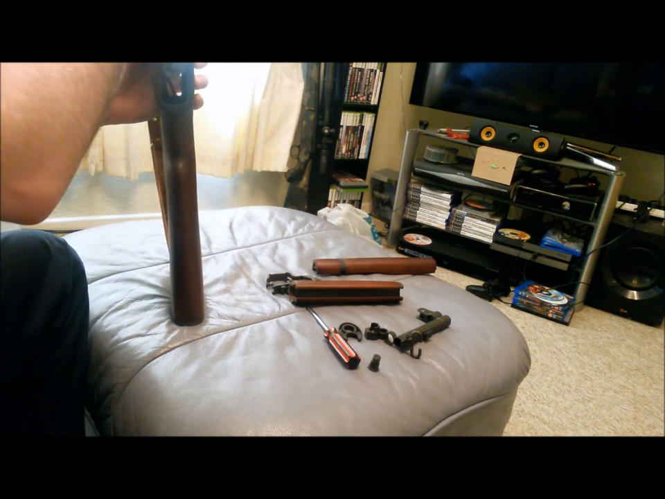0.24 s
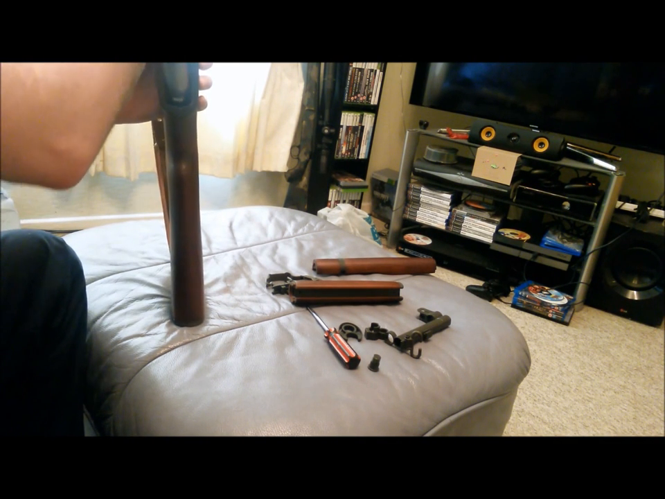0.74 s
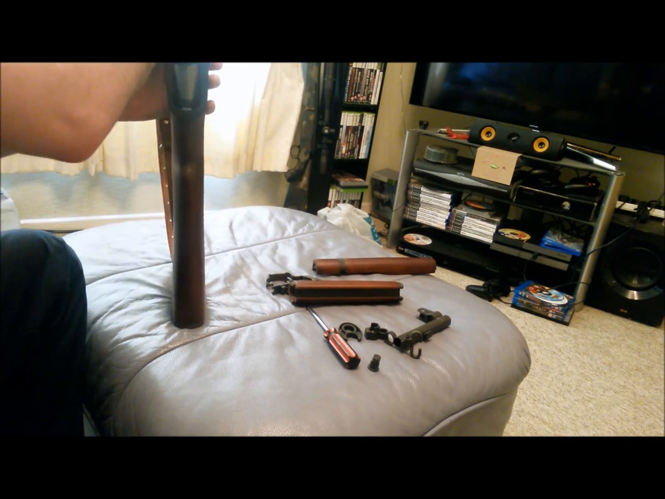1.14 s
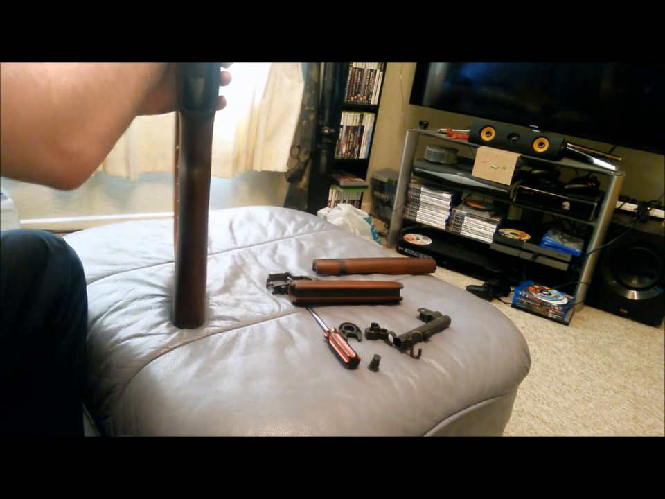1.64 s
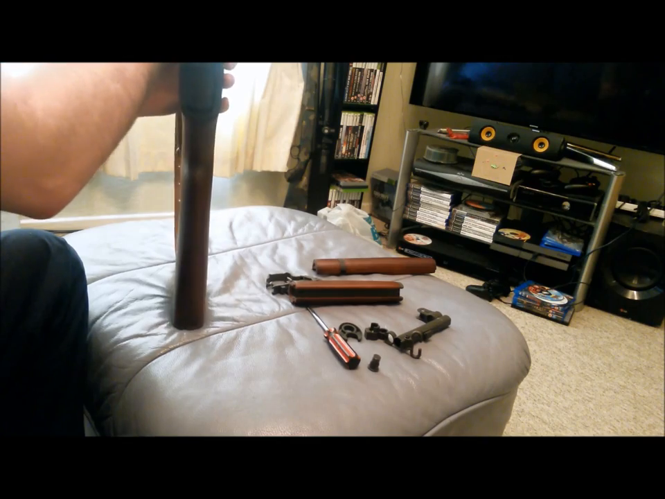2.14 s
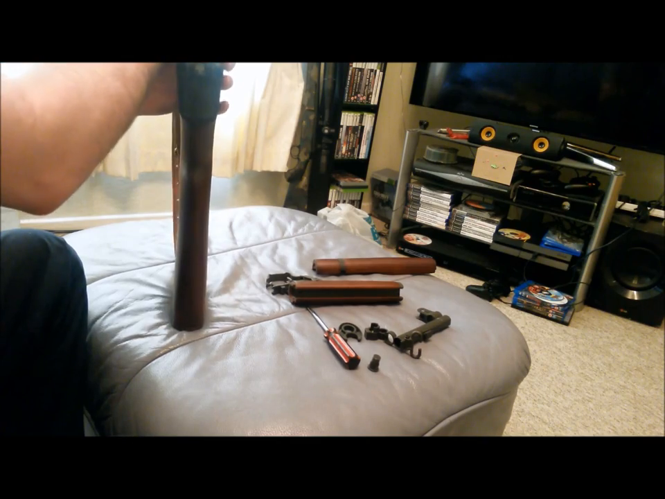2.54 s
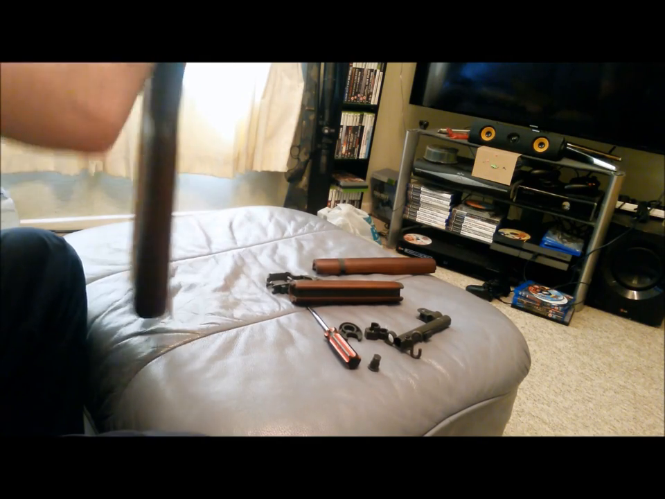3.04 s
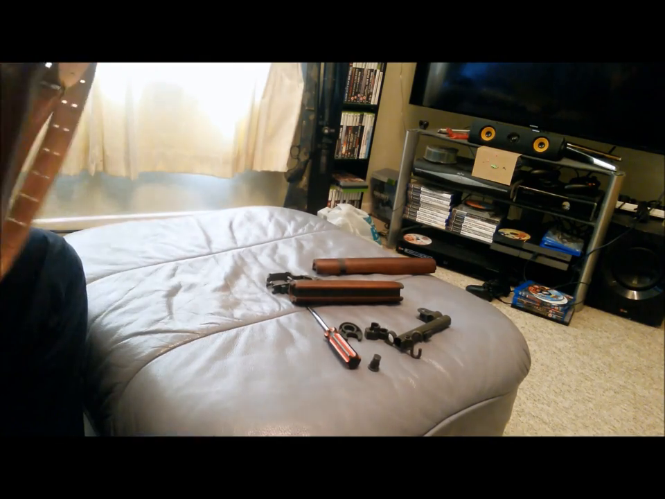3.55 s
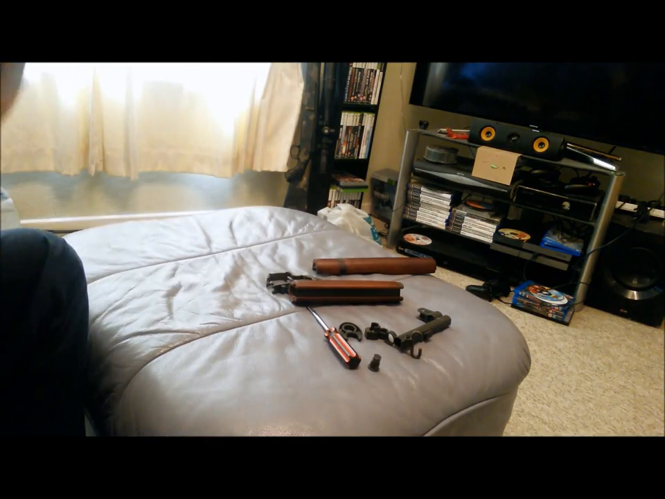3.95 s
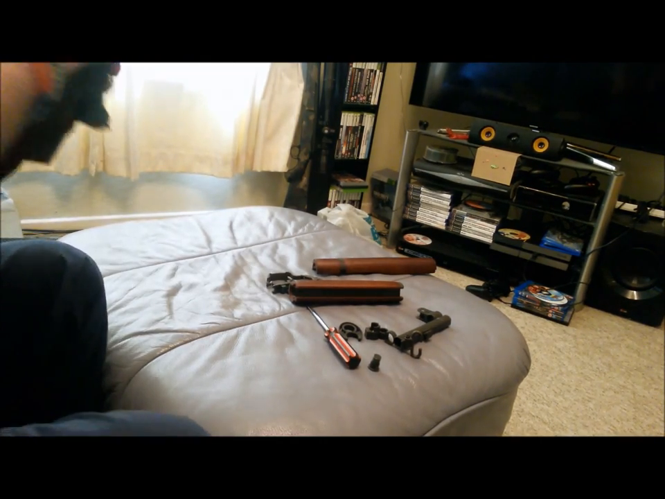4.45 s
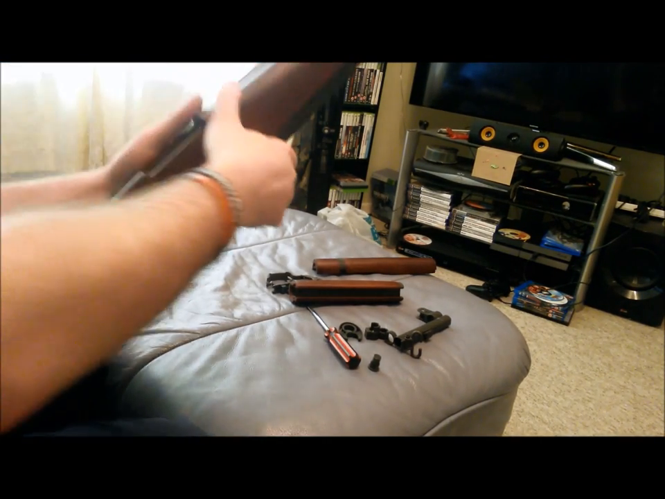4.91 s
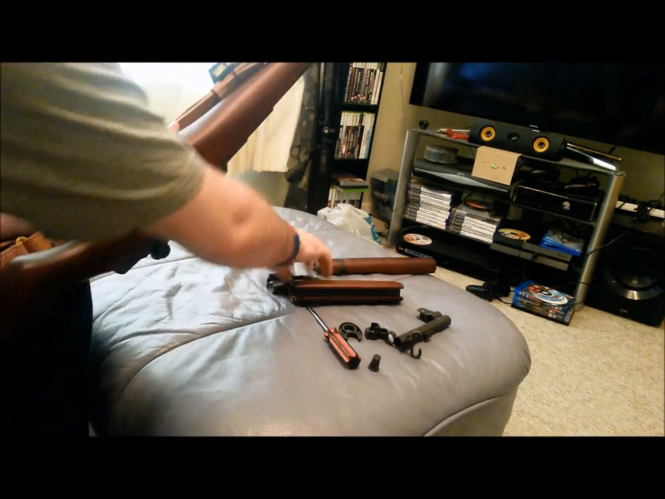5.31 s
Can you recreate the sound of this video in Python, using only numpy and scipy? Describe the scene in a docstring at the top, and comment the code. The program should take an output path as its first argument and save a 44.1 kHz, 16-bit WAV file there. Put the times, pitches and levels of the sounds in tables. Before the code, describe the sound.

A small living room, almost silent, with a very faint hush. From the start, barely audible rubbing and soft padded bumps of a rifle being handled at 0.1-0.3 s. A tiny part tick comes at 0.5 s, and a crisp steel catch click at 1.0 s. From 1.5 s dull bumps and light taps gather; a tight part slides with a grainy rasp at 1.7-1.95 s, ending in a knock and sharp click. Two short knocks follow at about 2.4 s, then the loudest, hard metallic cracks with a hollow body at 2.63-2.69 s. Another knock comes at 2.95 s, and a loose part rattles in quick weakening runs from 3.1 to 3.5 s. Cloth and hands swish through 4-5 s with small taps and faint clicks. At 5.5 s a bright steel piece clacks twice and rings thinly. Close stereo pickup, short room reflections, brighter on the right.

```python
"""An airsoft rifle is taken apart on a padded footstool in a small living room with a faint hush. Filtered
noise gives the rub of hands and clothes in swelling strokes and the slide of tight parts from the start; soft
bumps, low decaying cycles, join at once. From 0.5 s parts knock (ringing modes), from 1 s steel catches click.
The loudest knocks fall near 2.7 s; from 3.1 to 3.5 s a loose part rattles in runs of weakening contacts. At 5.5
s a steel piece clacks on the footstool, noise bursts over ringing modes. The right side is nearer, brighter."""
import sys
import numpy as np
from scipy import signal
from scipy.fft import rfft, irfft, next_fast_len
from scipy.io import wavfile
from scipy.ndimage import map_coordinates

SR = 44100
rng = np.random.default_rng(int(sys.argv[2]) if len(sys.argv) > 2 else 0)


def persist_wave(psi):
    """Save psi, clipped to +-1, as 16-bit WAV."""
    counts = np.round(np.clip(psi, -1, 1) * 32767).astype(np.int16)
    wavfile.write(sys.argv[1], SR, np.atleast_2d(counts).T)


N = 245894  # length [samples]
T = np.arange(SR // 4) / SR  # time within one blow [s]


def amp(db):
    """Decibels to gain."""
    return 10 ** (np.asarray(db) / 20)


def unit(x):
    """Scale to rms 1."""
    return x / np.sqrt(np.mean(x ** 2) + 1e-20)


def strike(x):
    """Scale a blow so that its first 4 ms have the power of a sine of peak 1."""
    onset = x[:SR // 250]
    return x / np.sqrt(2 * np.mean(onset ** 2) + 1e-20)


def along(points, hz):
    """Read a (frequency [Hz], value) curve on a log frequency axis."""
    f, v = np.transpose(points)
    return np.interp(np.log(hz + 1), np.log(f + 1), v)


def wobble(rate):
    """A smooth random curve with rate knots a second."""
    knots = rng.standard_normal(int(N * rate / SR) + 4)
    return map_coordinates(knots, [np.arange(N) * rate / SR])


def filtered(x, response):
    """Apply a response, given as a function of frequency, to x."""
    n = x.shape[-1]
    m = next_fast_len(n + 8192)
    hz = np.fft.rfftfreq(m, 1 / SR)
    return irfft(rfft(x, m) * response(hz), m)[..., :n]


def colour(x, spectrum):
    """Give x a spectrum through a minimum-phase filter, so nothing sounds early, at rms 1."""
    n = x.shape[-1]
    m = next_fast_len(n + 4096)
    gain = amp(along(spectrum, np.fft.rfftfreq(m, 1 / SR)))
    # folding the cepstrum onto positive times makes the filter causal
    cepstrum = irfft(np.log(gain), m)
    cepstrum[1:m // 2] *= 2
    cepstrum[m // 2 + 1:] = 0
    response = np.exp(rfft(cepstrum))
    return unit(irfft(rfft(x, m) * response, m)[..., :n])


def fade(t60):
    """Free decay of a struck thing, 60 dB in t60 seconds."""
    return 1000 ** (-T / max(t60, 1e-4))


def ring(modes):
    """Damped modes, struck at slightly new strengths and signs each time."""
    total = np.zeros(len(T))
    for hz, db, t60 in modes:
        strength = rng.choice([-1, 1]) * amp(db + rng.normal())
        total += strength * fade(t60) * np.sin(2 * np.pi * hz * T)
    return strike(total)


def crack(spectrum, t60):
    """The short noise of a contact: a decaying burst with the contact's colour."""
    burst = rng.standard_normal(len(T)) * fade(t60)
    return strike(colour(burst, spectrum))


def add(track, s, sound):
    """Mix a stereo sound in at time s."""
    part = track[:, max(round(s * SR), 0):][:, :sound.shape[1]]
    part += sound[:, :part.shape[1]]


# left-right likeness of diffuse sound: (frequency [Hz], correlation [1])
LIKENESS = [(100, 0.76), (400, 0.61), (1200, 0.033), (2500, 0.13), (8000, 0.031)]


def diffuse(pair):
    """Two unrelated noises become a sound field whose sides are most alike in the bass."""
    def mid_side(hz):
        turn = np.arccos(np.clip(along(LIKENESS, hz), -1, 1)) / 2
        return np.array([np.cos(turn), np.sin(turn)])
    mid, side = filtered(pair, mid_side)
    return np.array([mid + side, mid - side])


# how long the room rings: (frequency [Hz], t60 [s])
ROOM_DECAY = [(80, 0.17), (150, 0.26), (400, 0.34), (1100, 0.24), (3000, 0.26), (7500, 0.23), (14000, 0.23)]


def in_room(x, wet_db, first_wall=0.004):
    """Direct sound, reaching the right side first, then the walls' answer as decaying diffuse noise."""
    hz, t, z = signal.stft(rng.standard_normal((2, SR // 3)), SR, nperseg=256)
    t60 = np.maximum(along(ROOM_DECAY, hz), .02)
    decay = 1000 ** (-t / t60[:, None])
    tail = diffuse(signal.istft(z * decay, SR, nperseg=256)[1])
    tail_time = np.arange(tail.shape[1]) / SR
    tail = tail * (1 - np.exp(-(tail_time / first_wall) ** 2))  # the walls answer after a moment
    paths = amp(wet_db) * tail / np.linalg.norm(tail[0])
    paths[[0, 1], [4, 0]] += 1  # direct sound: left 4 samples after right
    return signal.fftconvolve(x[None], paths, axes=1)


# colour of the idle room: (frequency [Hz], level [dB])
HUSH_COLOUR = [(20, -24), (33, -11.5), (50, -4.5), (62, -20.5), (85, -5), (150, -10.5), (250, -9.5),
               (500, -19.5), (1000, -24.5), (1450, -17.5), (2500, -24), (5000, -24), (8000, -26),
               (14500, -24)]
HUSH_DB = -72


def room_hush():
    """The idle room: steady diffuse noise, coloured."""
    return amp(HUSH_DB) * colour(diffuse(rng.standard_normal((2, N))), HUSH_COLOUR)


def effort(strokes):
    """Gain per sample: each stroke speeds up smoothly, then slows to rest; overlaps add in power."""
    t = np.arange(N) / SR
    power = np.zeros(N)
    for s, rise, fall, db in strokes:
        moving = (t > s) & (t < s + rise + fall)
        progress = np.interp(t[moving], [s, s + rise, s + rise + fall], [0, 1, 0])
        speed = np.sin(np.pi / 2 * progress) ** 2
        power[moving] += (amp(db) * speed) ** 2
    return np.sqrt(power)


def friction(spectrum, grains_per_s, grain_share, unsteady_db):
    """Many tiny slips of uneven size over a smooth rub, unsteady in level."""
    slips = (rng.random(N) < grains_per_s / SR) * rng.standard_normal(N)
    share = np.clip(grain_share, 0, 1)
    smooth_rub = rng.standard_normal(N)
    force = np.sqrt(share) * unit(slips) + np.sqrt(1 - share) * smooth_rub
    return colour(force * amp(unsteady_db * wobble(60)), spectrum)


# colour of rubbed cloth: (frequency [Hz], level [dB])
CLOTH_COLOUR = [(290, -26), (500, -6.5), (796, -5.5), (1060, -5.5), (1180, -3.5), (1630, -13), (1930, -2.5),
                (2230, -8), (3590, -6.5), (5330, -5), (7690, -0.5), (14500, -18)]
# strokes of sleeves and trousers: (time [s], speeding up [s], slowing down [s], level at full speed [dB])
CLOTH_STROKES = [(-0.1, 0.29, 0.31, -73), (0.38, 0.14, 0.17, -74), (0.78, 0.044, 0.1, -77),
                 (0.88, 0.061, 0.41, -71), (1.28, .11, 0.21, -73), (1.45, .1, 0.11, -63.5),
                 (1.58, 0.094, 0.45, -62), (1.82, 0.12, 0.061, -51.5), (2.0, .17, 0.088, -68.5),
                 (2.24, 0.023, 0.53, -64.5), (2.8, 0.14, 0.51, -61.5), (3.18, 0.19, 0.13, -54.5),
                 (3.46, 0.016, 0.39, -60), (3.7, 0.11, 0.27, -59.5), (4.0, 0.26, 0.18, -63),
                 (4.26, 0.19, 0.47, -57), (4.68, 0.056, 0.19, -60), (4.84, 0.057, 0.58, -65),
                 (5.08, 0.2, 1, -61)]


def cloth_swishes():
    """Sleeves and trousers swish: dense small slips over a mostly smooth rub."""
    rub = friction(CLOTH_COLOUR, grains_per_s=1400, grain_share=0.33, unsteady_db=-1.0)
    return effort(CLOTH_STROKES) * rub


# colour of hands on the stock: (frequency [Hz], level [dB])
HAND_COLOUR = [(29, -37), (50, -6), (138, 3.5), (248, -7), (312, 2.5), (347, -8.5), (445, -6), (859, -8.5),
               (1030, -30), (1290, -4.5), (2240, -25.5), (3500, -16), (4550, -54), (7700, -120)]
# shifts of the grip: (time [s], speeding up [s], slowing down [s], level at full speed [dB])
HAND_STROKES = [(0.08, 0.1, 0.27, -71.5), (1.57, 0.13, 0.039, -56), (1.76, 0.039, 0.29, -61),
                (2.07, 0.025, 0.14, -65), (3.28, 0.14, 0.43, -69.5), (4.31, 0.19, 0.44, -57.5),
                (4.85, 0.16, 0.93, -72), (5.42, 0.031, 0.17, -58.5)]


def hand_shifts():
    """Hands shift on the stock: sparser slips with little smooth rub."""
    rub = friction(HAND_COLOUR, grains_per_s=260, grain_share=0.89, unsteady_db=0.2)
    return effort(HAND_STROKES) * rub


# colour of hard parts scraping: (frequency [Hz], level [dB])
SCRAPE_COLOUR = [(150, -31.5), (350, -25.5), (600, -25.5), (900, -6.5), (1450, -5), (2050, -10.5),
                 (2600, -17), (4200, -15), (5500, -21.5), (7600, -10), (10000, -43.5), (14000, -28.5)]
# slides of tight parts:
# (time [s], speeding up [s], slowing down [s], level of the rasp at full speed [dB], part's resonance [Hz])
PART_SLIDES = [(0.0, 0.23, 0.14, -70.5, 1460), (0.39, 0.073, 0.079, -76.5, 1450),
               (1.419, 0.18, 0.19, -65.5, 1660), (1.71, 0.2, 0.07, -44.5, 1760),
               (2.24, .1, 0.069, -56, 1880), (2.9, 0.14, 0.35, -63.5, 1147), (3.24, 0.13, 0.1, -59.5, 770),
               (3.46, 0.098, 0.067, -59.5, 740)]
SLIDE_RING_DB, SLIDE_WIDTH_HZ = 0.5, 185  # strength and width of that resonance


def scraping():
    """A sliding part rasps in tiny slips and sings a little at its own resonance."""
    rasp = friction(SCRAPE_COLOUR, grains_per_s=900, grain_share=.7, unsteady_db=2)
    out = np.zeros(N)
    for s, rise, fall, db, hz in PART_SLIDES:
        stroke = effort([(s, rise, fall, db)]) * rasp
        b, a = signal.iirpeak(hz, hz / SLIDE_WIDTH_HZ, SR)
        out += stroke + amp(SLIDE_RING_DB) * signal.lfilter(b, a, stroke)
    return out


def rubbing():
    """All friction, sliding parts, cloth and hands, sounds from one place in the room."""
    dry_rub = scraping() + cloth_swishes() + hand_shifts()
    return in_room(dry_rub, wet_db=0.53)[:, :N]


# colour of the dull puff: (frequency [Hz], level [dB])
PUFF_COLOUR = [(30, -41.5), (75, 2), (140, 7), (230, -9), (330, 2), (600, -9.5), (1200, -22.5),
               (4000, -60.5)]
# soft bumps of the stock and hands: (time [s], level before a common trim [dB], pitch [Hz])
SOFT_BUMPS = [(0.104, -53, 160), (0.168, -50, 240), (0.286, -51.5, 163), (0.916, -59, 177),
              (1.004, -43, 504), (1.504, -38.5, 310), (1.672, -41.5, 167), (1.712, -43.5, 80),
              (1.826, -43.5, 158), (2.116, -42, 327), (2.132, -49, 114), (2.447, -45.5, 154),
              (2.902, -38.5, 169), (4.378, -45, 320), (5.436, -39, 155)]


def bumps():
    """Padded blows: a few low cycles and a dull puff."""
    out = np.zeros((2, N))
    for s, db, hz in SOFT_BUMPS:
        onset = 1 - np.exp(-T * hz * 2)
        push = np.sin(2 * np.pi * hz * T) * fade(12 / hz) * onset  # the same few cycles at any pitch
        puff = amp(-8.5) * crack(PUFF_COLOUR, t60=0.078)
        add(out, s, in_room(amp(db - 4.0) * (push + puff), wet_db=-1))
    return out


# the rifle's body modes: (frequency [Hz], level [dB], t60 [s])
BODY_MODES = [(580, -29.5, 0.065), (835, -8, 0.021), (1170, -1.5, 0.007), (1324, -17.5, 0.012),
              (1600, -3, 0.0088), (1847, 0.5, 0.0098), (1978, -11, 0.027), (2133, -8.5, 0.02)]
# the barrel's modes: (pitch ratio [1], level [dB])
BARREL_MODES = [(1, 3), (1.85, -16), (2.66, -15.5)]
# the force of a blunt blow: (frequency [Hz], level [dB])
BLOW_FORCE = [(30, -35), (300, 0.5), (700, 0), (2050, -1), (2700, 4.5), (9000, -48)]
# faint after-ring of the steel tube, the same modes for every blow: (frequency [Hz], level [dB], t60 [s])
TUBE_MODES = [(765, -8.5, 0.12), (1110, -1, 0.21), (1254, -1, 0.37), (1715, -6.5, 0.2), (2030, -10.5, .15)]
# contact noise of catches and stock, also heard in clicks: (frequency [Hz], level [dB])
SNAP_COLOUR = [(300, -25), (1200, -7), (2300, -2), (3300, -1), (4300, -2), (5300, -3), (7000, -1),
               (8300, -2), (9800, -13), (12000, -30), (14000, -36)]
# the wooden stock's modes, the lowest a low room resonance the blow sets ringing: (frequency [Hz], level [dB],
# t60 [s])
STOCK_MODES = [(146, -2, 0.06), (310, -4, 0.026), (435, 4.5, 0.019), (545, -30, 0.031), (635, -7, 0.056)]
GRIT_DB, GRIT_T60_S = -4, .024  # scraping noise within a blow
TUBE_DB = -20.5  # after-ring against the body


def blow(db, barrel_hz, snap_db, thud_db, barrel_db, t60):
    """A contact rings body and barrel, whose pitch shifts with the grip, and thuds in the wooden stock."""
    barrel = ring([(ratio * barrel_hz, mode_db, t60) for ratio, mode_db in BARREL_MODES])
    grit = amp(GRIT_DB) * crack(SCRAPE_COLOUR, GRIT_T60_S)
    metal = ring(BODY_MODES) + amp(barrel_db) * barrel + grit
    body = strike(colour(metal, BLOW_FORCE)) + amp(TUBE_DB) * ring(TUBE_MODES)
    snap = amp(snap_db + 0.5) * crack(SNAP_COLOUR, t60=0.024)
    thud = amp(thud_db) * ring(STOCK_MODES) * (1 - np.exp(-T / 0.0021))  # wood yields slowly
    return in_room(amp(db - 5.5) * (body + snap + thud), wet_db=-0.5)


# a loose part chattering in its seat: (time [s], length [s], first contact's level before the blow's trim [dB])
RATTLE_RUNS = [(3.071, .045, -38), (3.3676, .075, -32.5), (3.479, .06, -35.5)]
RATTLE_GAP_S, RATTLE_JITTER_S = 0.016, 0.0011  # between contacts, and their scatter
RATTLE_LOSS_DB_PER_S = 100  # dying away
RATTLE_HZ, RATTLE_SNAP_DB, RATTLE_THUD_DB, RATTLE_RING_DB = 742, -5, -16, -2.5  # how a contact rings the rifle


def rattles():
    """A loose part chatters in a quick, slightly uneven run of ever weaker contacts."""
    out = np.zeros((2, N))
    for s, length, db in RATTLE_RUNS:
        for after in np.arange(0, length, RATTLE_GAP_S):
            hz = RATTLE_HZ * (1 + 0.046 * rng.normal())
            level = db - RATTLE_LOSS_DB_PER_S * after
            contact = blow(level, hz, RATTLE_SNAP_DB, RATTLE_THUD_DB, RATTLE_RING_DB, t60=0.023)
            add(out, s + after + RATTLE_JITTER_S * rng.normal(), contact)
    return out


# colour of the bright sizzle: (frequency [Hz], level [dB])
SIZZLE_COLOUR = [(5000, -47), (8000, -24), (9700, 6.5), (11500, -5.5), (14000, -9.5)]
# sharp steel catches, levels before common trims:
# (time [s], level [dB], ping pitch [Hz], body level [dB], ping level [dB], sizzle level [dB])
CATCH_CLICKS = [(0.991, -27, 3580, -24, -5, -19), (0.996, -22.5, 7060, -35, 8, -4),
                (1.056, -35.5, 6600, -12, -7, -18.5), (1.9228, -25.5, 5640, -2, 0, -15),
                (2.4414, -36, 6200, -17, -13, -33), (2.4465, -43, 6940, -4, -6.5, -25),
                (2.4804, -44.5, 5460, -17, 12, -19.5), (2.688, -16.5, 3940, -10.5, -1, -42),
                (4.2186, -43, 3940, -30.5, 20, -20), (4.4773, -37.5, 6860, -36, 7, -32)]
PING_T60_S = .0045


def clicks():
    """Steel catches snap, ping briefly and shake the body a little."""
    out = np.zeros((2, N))
    for s, db, ping_hz, body_db, ping_db, sizzle_db in CATCH_CLICKS:
        ping = strike(np.sin(2 * np.pi * ping_hz * T) * fade(PING_T60_S))
        snap = strike(crack(SNAP_COLOUR, t60=0.007) + amp(ping_db) * ping)
        sizzle = amp(sizzle_db) * crack(SIZZLE_COLOUR, t60=0.0073)
        body = amp(body_db - 18.5) * ring(BODY_MODES)
        add(out, s, in_room(amp(db - 7.0) * (snap + sizzle + body), wet_db=0.5))
    return out


# contact noise of the steel piece: (frequency [Hz], level [dB])
CLACK_COLOUR = [(200, -43), (800, -38), (1400, -17.5), (2400, -13), (3300, -11), (5400, -8), (7000, 0.5),
                (8600, 0), (10200, -14), (12300, -14.5), (14000, -9)]
# the loose steel piece's modes: (frequency [Hz], level [dB], t60 [s])
STEEL_MODES = [(2520, -20, .1), (4050, -16, .15), (6831, -5, .2), (7563, -6, .15), (7694, -6, .15),
               (8462, -10, .12), (8618, 1, .25), (8821, -7, .12), (13824, -18, .1)]
# the steel piece landing and chattering: (time [s], level before the trims of noise, ring and sides [dB])
STEEL_LANDINGS = [(5.5278, -7.5), (5.542, -19), (5.548, -8)]


def clacks():
    """The steel piece lands on the footstool, chatters and rings on."""
    out = np.zeros((2, N))
    for s, db in STEEL_LANDINGS:
        add(out, s, in_room(amp(db - 7.5) * crack(CLACK_COLOUR, t60=.011), wet_db=3.5))
        add(out, s, in_room(amp(db - 16) * ring(STEEL_MODES), wet_db=-10))
    return out * amp([[-4], [1]])  # stronger on the right


# parts knocking on the rifle, level and snap before the blow's trims: (time [s], level [dB],
# barrel pitch [Hz], snap level [dB], thud level [dB], barrel level [dB], barrel t60 as the grip lets it ring [s])
PART_KNOCKS = [(0.513, -48.5, 1490, -12, -22, 6, 0.037), (0.519, -47.5, 1298, -7, -6, 16, 0.063),
               (0.527, -49, 1400, -1, -25, -5, 0.022), (1.137, -53, 1360, -4, 8.5, 10, 0.024),
               (1.507, -49, 1354, -7, 10, 3, 0.099), (1.548, -48, 1470, 1.5, -20, 12, .03),
               (1.621, -40, 750, -22, -1.5, -1.5, .025), (1.699, -40, 1250, -5, -21, -3, 0.071),
               (1.863, -29.5, 1265, -6.5, -44, -14, 0.067), (2.082, -45, 1380, -14, 0.5, -7, 0.027),
               (2.353, -29.5, 1260, -17, -3.5, 6.5, 0.021), (2.435, -29.5, 1440, -27, -0.5, 11, 0.0074),
               (2.589, -49.5, 1260, -8, 5, -5.5, .045), (2.617, -40.5, 1660, -0.5, -28, 0, .024),
               (2.6354, -17.5, 1206, -5, -15.5, 6.5, 0.05), (2.671, -9.5, 1265, -19, -16.5, 2.5, 0.023),
               (2.6878, -20, 1590, -6, -4, 12, 0.013), (2.948, -29, 1131, -15, -24, 17, 0.061),
               (3.315, -32, 1177, -3.5, -11.5, 9, 0.028), (3.789, -46, 850, 2, -7, 9, 0.032),
               (4.027, -46, 1150, -4.5, -10, 3, 0.021), (4.184, -55, 1097, 6, 1, 14, 0.087),
               (4.27, -40, 1160, 3, -12.5, -30, 0.008), (4.453, -38.5, 736, -4, -25, 2.5, 0.037),
               (4.594, -43.5, 1220, 0.5, 1.5, 10, 0.015), (4.739, -47.5, 1150, 5, -31, -17, .03),
               (5.002, -51.5, 1200, -10, -5, -5, 0.035), (5.483, -48, 1150, -6, -8, -3, .02)]


def knocks():
    """Single blows as parts come free or meet their stops."""
    out = np.zeros((2, N))
    for s, db, barrel_hz, snap_db, thud_db, barrel_db, t60 in PART_KNOCKS:
        add(out, s, blow(db, barrel_hz, snap_db, thud_db, barrel_db, t60))
    return out


def scene():
    """Handling sounds over the faint hush of the room."""
    return room_hush() + rubbing() + bumps() + rattles() + clicks() + clacks() + knocks()


# right side against left: (frequency [Hz], level [dB])
RIGHT_OVER_LEFT = [(100, 2), (600, 2), (1300, 4), (2400, 4.5), (4300, 4.5), (6000, 10.5), (8000, 15.5),
                   (11000, 7.5), (14000, 3.5)]
TOP_HZ = 14650  # band limit


def record(dry):
    """The right microphone hears more treble than the left; both end at the band limit."""
    def microphones(hz):
        right = amp(along(RIGHT_OVER_LEFT, hz))
        balance = np.sqrt(2 / (1 + right ** 2))  # keeps the summed power of both sides
        return np.array([np.ones_like(hz), right]) * balance * (hz < TOP_HZ)
    return filtered(dry, microphones)


dry = scene()
out = record(dry)
persist_wave(out)
```